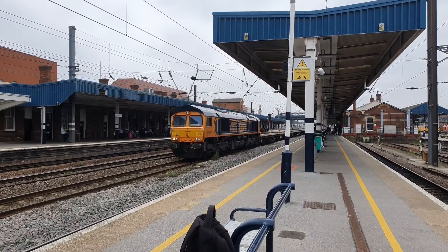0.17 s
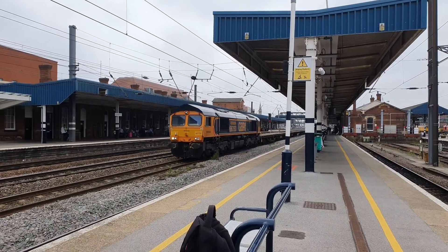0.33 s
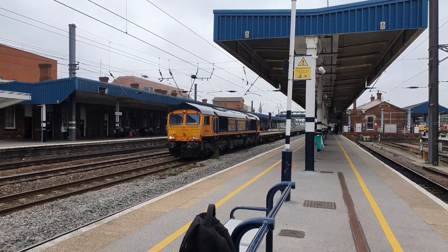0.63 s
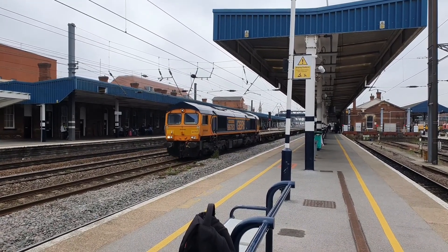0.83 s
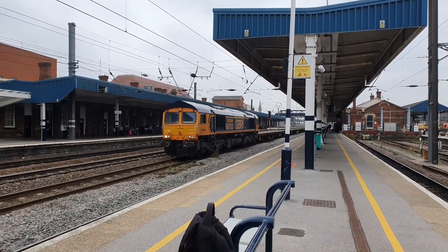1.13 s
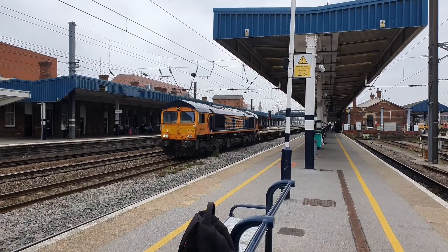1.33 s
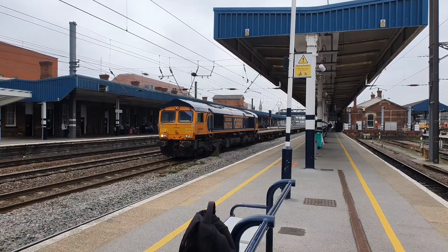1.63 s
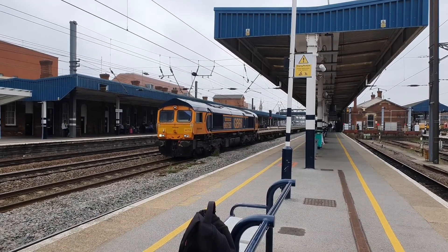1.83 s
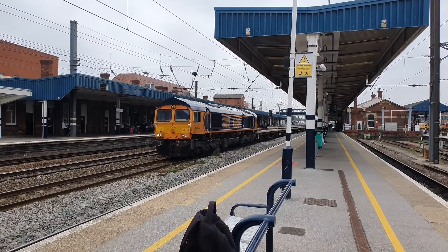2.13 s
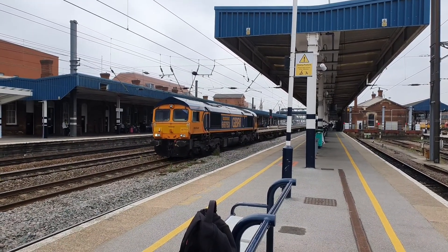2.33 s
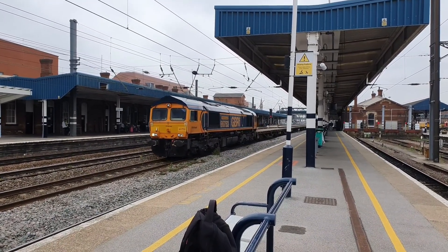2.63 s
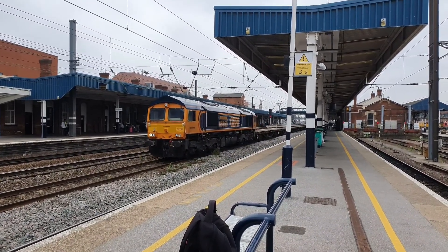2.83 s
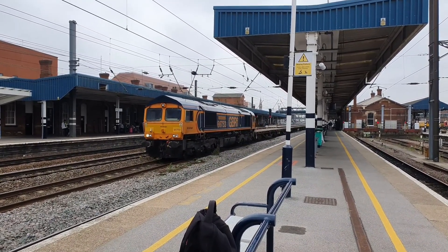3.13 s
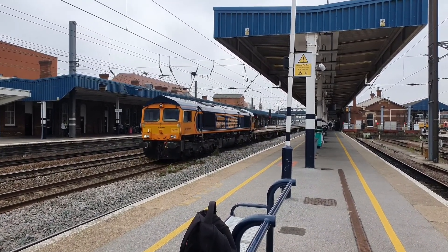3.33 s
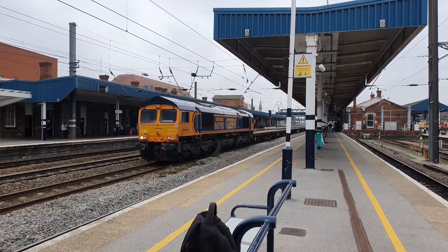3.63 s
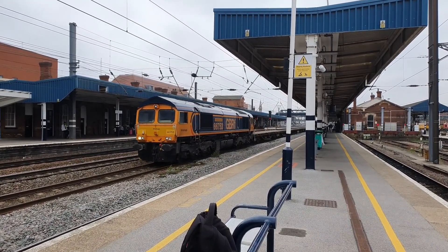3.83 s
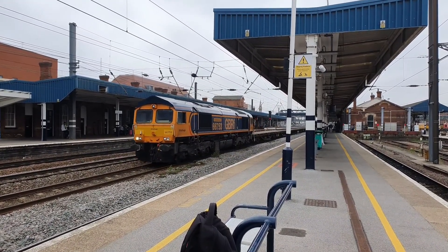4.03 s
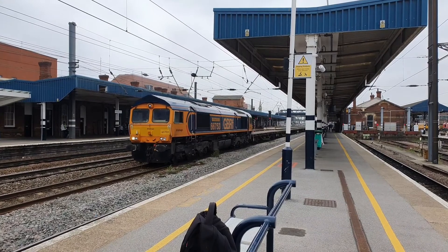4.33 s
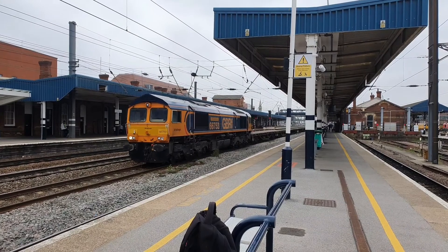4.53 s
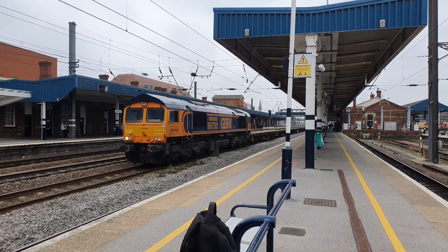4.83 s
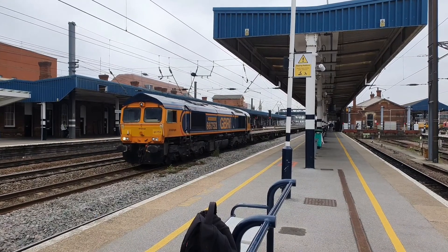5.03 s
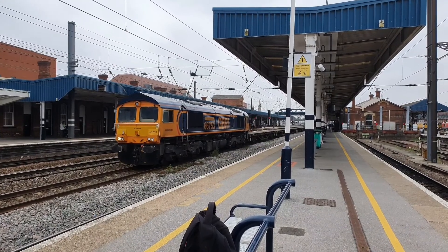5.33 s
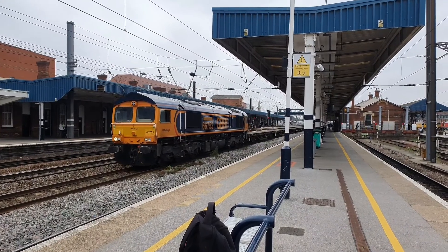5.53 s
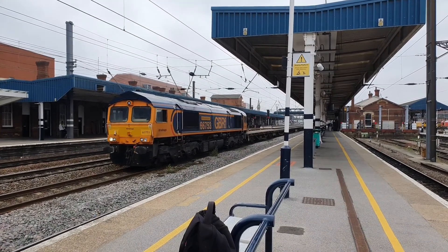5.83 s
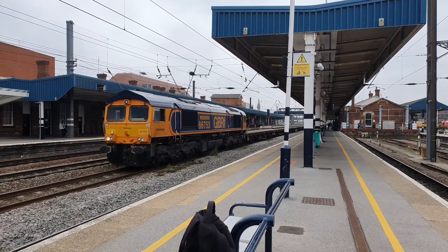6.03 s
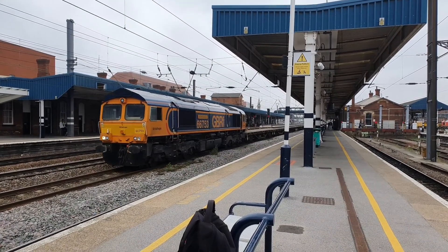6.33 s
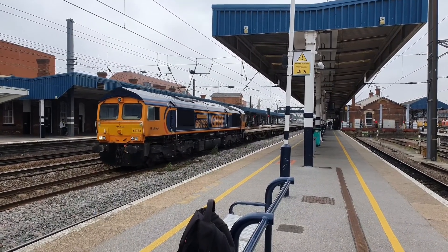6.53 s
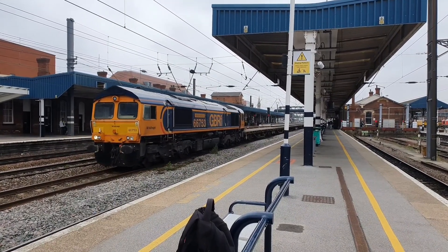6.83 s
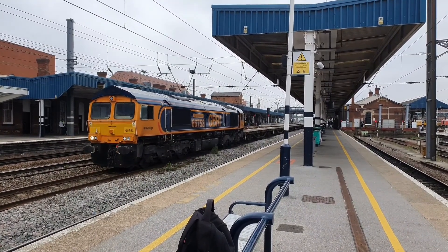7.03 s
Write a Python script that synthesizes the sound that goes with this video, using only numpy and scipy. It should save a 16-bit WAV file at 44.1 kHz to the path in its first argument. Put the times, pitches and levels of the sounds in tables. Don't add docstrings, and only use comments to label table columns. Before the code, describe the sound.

Continuous diesel engine at low steady speed, some distance away and slowly approaching beside a platform canopy. Low humming pulses, woolly rumble and repeating metallic clatter sit beneath a medium hum-like whine and a thin higher whistle. Compressed air spits crisply once near the start, again more softly, then only faintly. Soft low wind puffs touch the hand-held microphone mainly in the middle. The whines grow clearer by the end.

```python
import sys
import numpy as np
from scipy import signal
from scipy.fft import rfft, irfft, next_fast_len
from scipy.io import wavfile

SR = 44100
rng = np.random.default_rng(int(sys.argv[2]) if len(sys.argv) > 2 else 0)


def wav_record(signal):
    frames = np.transpose(np.atleast_2d(signal))
    bounded = np.clip(frames, -1, 1)
    quanta = np.round(bounded * 32767).astype(np.int16)
    wavfile.write(sys.argv[1], SR, quanta)


def attenuation_scalar(level_db):
    decades = np.asarray(level_db, float) / 20
    return 10 ** decades


N = 316638
SIZE = next_fast_len(N)
HZ = np.fft.rfftfreq(SIZE, 1 / SR)
T = np.arange(N) / SR
SLOW_T = T[::20]
CRANK_HZ = 5.7385


def evened(x):
    return x / np.sqrt(np.mean(abs(x) ** 2) + 1e-20)


def read(points, hz, order=1):
    table = np.array(points)
    return np.interp(np.log(hz + 1), np.log(table[:, 0] + 1), table[:, order])


def filtered(x, gain):
    return irfft(rfft(x, SIZE) * gain, SIZE)[:, :N]


def noise(gain):
    return evened(filtered(rng.standard_normal((2, SIZE)), gain))


def drift(rate_hz, count):
    knots = rng.standard_normal((count, 256))
    return evened(np.array([np.interp(T * rate_hz, np.arange(256), k) for k in knots]))


def flutter(rate_hz, count):
    knots = rng.standard_normal((2 * count, 2400))
    rows = np.array([np.interp(SLOW_T * rate_hz, np.arange(2400), k) for k in knots])
    return evened(rows[:count] + 1j * rows[count:])


def approach(t, far_db, near_db):
    return far_db + (near_db - far_db) * t * SR / N


def throb(t, once, at_once, twice, at_twice):
    turn = 2 * np.pi * CRANK_HZ * t
    swell_once = once * np.cos(turn - 2 * np.pi * at_once)
    swell_twice = twice * np.cos(2 * turn - 4 * np.pi * at_twice)
    return 1 + swell_once + swell_twice


# (multiple of crank speed, level far [dB], level near [dB])
EXHAUST = [(6, -47, -47), (7, -35, -50), (8, -47, -40), (9, -29, -25), (10, -51, -50), (11, -45, -35),
           (12, -41, -42), (13, -44, -47), (14, -45, -41), (15, -31, -33), (16, -34, -39), (17, -41, -47)]
# (multiple of crank speed, level far [dB], level near [dB])
BLOCK = [(29, -45, -39), (30, -48, -47), (31, -49, -43), (32, -44, -32), (33, -47, -44), (34, -46, -45),
         (35, -51, -40), (36, -53, -46), (46, -47, -43), (47, -49, -45), (48, -44, -44), (54, -49, -46),
         (57, -44, -46), (68, -60, -49), (69, -49, -50), (75, -47, -46), (79, -36, -45), (80, -41, -48),
         (81, -40, -42), (82, -43, -47), (84, -44, -46), (98, -50, -48)]
THUMPS = [(6, .26, .49, .7), (13, .28, .165, .42), (29, .125, .1, .06), (31, .125, .19, .31),
          (34, .125, .06, .1), (40, .33, -.2, -.2), (54, .87, .31, .31)]


def orders():
    null_s, null_width_s, null_depth_db = 2.76, 2, -3.5
    wall_null_db = null_depth_db * np.exp(-((SLOW_T - null_s) / null_width_s) ** 2)
    out = 0
    for k, far_db, near_db in EXHAUST + BLOCK:
        _, angle, *shape = [thump for thump in THUMPS if thump[0] <= k][-1]
        shared, apart = flutter(2.2, count=2)
        echo = 1 + .12 * shared + .2 * np.outer([1, -1], apart)
        turns = k * (CRANK_HZ * SLOW_T - angle) + shape[int(k) % 2]
        wave = np.exp(2j * np.pi * turns)
        db = approach(SLOW_T, far_db, near_db) + wall_null_db * (k < 9.5)
        out = out + np.sqrt(2) * attenuation_scalar(db) * (echo * wave).real
    return signal.resample_poly(out, 20, 1, axis=1)[:, :N]


# (frequency [Hz], level [dB per Hz])
CLATTER = [(45, -47), (130, -10), (260, -3.5), (350, -4.5), (450, -1.5), (620, -11.5), (900, -12.5),
           (1250, -17), (1700, -21.5), (2800, -15.5), (3300, -24.5), (4300, -32.5), (6800, -37.5),
           (8000, -52.5)]
# (frequency [Hz], level [dB per Hz])
AIR_TOP = [(7600, 2), (9100, 4), (11400, -2), (12000, -9), (15000, -10)]
# (frequency [Hz], share [0-1])
REPEAT = [(150, .75), (300, .88), (520, .88), (800, .7), (1100, .55), (1600, .3), (3500, .4), (4500, .02)]
# (frequency [Hz], likeness [0-1])
MEMORY = [(300, .94), (1000, .87), (2500, .55), (5000, .4)]


def clatter():
    far_db, near_db = -35, -34
    share = np.clip(read(REPEAT, HZ), 0, 1)
    memory = np.clip(read(MEMORY, HZ), 0, .97)
    one_turn_later = np.exp(-2j * np.pi * HZ / CRANK_HZ)
    comb = (1 - memory ** 2) / abs(1 - memory * one_turn_later) ** 2
    x = noise(np.sqrt(1 - share + share * comb)) * throb(T, 0.032, 0.36, 0.098, 0.24)
    x = filtered(x, attenuation_scalar(read(CLATTER, HZ) + read(AIR_TOP, HZ)))
    band = (HZ > 500) & (HZ < 2800)
    band_rms = np.sqrt(np.mean(irfft(rfft(x, SIZE) * band, SIZE) ** 2))
    return attenuation_scalar(approach(T, far_db, near_db)) * x / band_rms


# (level far [dB], level near [dB], fuzz width [Hz], clean share [0-1])
WHINES = [(-38.5, -33.5, 12, 0.87), (-58, -40.5, 79, 0.19), (-45, -43, 36, 0.84), (-48.5, -44.5, 25, 0.3),
          (-56, -47.5, 7.2, 0.33), (-55, -57.5, 10, 0), (-49, -46, 26, 0.38), (-78, -47, 12, 0.1),
          (-53, -42.5, 65, 0.06), (-39.5, -39.5, 46, 0.66), (-56, -63, 10, 0.1), (-55.5, -64, 12, 0.3),
          (-56.5, -50.5, 64, .0), (-53.5, -55.5, 51, 0.29), (-72.5, -70, 570, 0), (-50, -70, 15, 1),
          (-58.5, -56, 170, 0), (-67, -63, 18, 0.1)]
# (pitch [Hz], depth once a turn [0-1], angle [turns], depth twice a turn [0-1], angle [turns])
BEATS = [(418.5, .08, .19, .05, .28), (711.7, .2, .3, .2, .1), (906.7, .1, .72, .15, .31),
         (1344.6, .35, .61, .15, .25), (1360.2, .2, .61, .1, .25), (1582.7, .3, .5, .1, .2),
         (2016.7, .55, .51, .2, .5), (2261.1, .2, .99, .1, .42), (2985, .2, .41, .2, .3),
         (3058, .3, .41, .42, .32), (3368, .3, .4, .3, .3), (3477.3, .2, .4, .1, .3),
         (5562, .05, .62, .1, .08), (6048, .45, .58, .15, .45), (11150, .04, .5, .03, .39),
         (1812, .2, .5, .1, .3), (3690, .3, .35, .3, .3), (4032, .5, .51, .2, .5)]


def whines():
    twist, shake = .55, .45
    rough = .33
    facing_s, facing_width_s, facing_db = 3.9, 1.6, 1
    swell_db = facing_db * np.exp(-((SLOW_T - facing_s) / facing_width_s) ** 2)
    turn, size = 2 * np.pi * CRANK_HZ * SLOW_T, len(SLOW_T)
    slow_hz = np.fft.fftfreq(size, 20 / SR)
    slow_bins = np.fft.fftfreq(size, 1 / size).round().astype(int)
    quarter_apart = np.array([[0], [np.pi / 2]])
    spectrum = np.zeros((2, 10 * size + 1), complex)
    for (far_db, near_db, width, clean), (hz, *beat) in zip(WHINES, BEATS):
        clean = np.clip(clean, 0, 1)
        uneven = np.cos(turn - 2 * np.pi * beat[1]) + .7 * np.cos(2 * turn - 4 * np.pi * beat[3])
        bend = hz / 1500 * (twist * uneven + shake * flutter(14., count=2).real)
        line = np.exp(1j * (bend + quarter_apart)) * (1 + rough * flutter(30., count=2).real)
        skirt = np.exp(-1.5 * abs(slow_hz) / np.clip(width, 1, 300))
        grain = rng.standard_normal((size, 2, 2)) @ [1, 1j]
        fuzz = evened(np.fft.ifft(np.fft.fft(grain, axis=0).T * skirt))
        db = approach(SLOW_T, far_db, near_db) + swell_db * (3000 < hz < 3200)
        tone = np.sqrt(clean) * line + np.sqrt(1 - clean) * fuzz
        shape = attenuation_scalar(db) * throb(SLOW_T, *beat) * tone
        place = round(hz * 20 * size / SR) + slow_bins
        above_zero = place > 0
        spectrum[:, place[above_zero]] += np.fft.fft(shape)[:, above_zero]
    return 10 * np.sqrt(2) * irfft(spectrum, 20 * size)[:, :N]


# (frequency [Hz], level [dB per Hz])
SPIT = [(2500, -30), (4000, -12), (6300, 1), (7700, -5), (9400, -3), (12000, -3), (14300, -6), (14900, -25)]
# (time [s], level [dB], hold [s])
SPITS = [
    (1.585, -52.5, .06),
    (3.12, -74, .12),
    (3.69, -62, .07),
    (4.2, -75, .05),
    (4.79, -73, .06),
    (5.47, -72, .2),
    (5.78, -74, .04),
    (6.35, -74, .1),
]


def spits():
    rise_s, grain_db = 0.016, 1
    colour = attenuation_scalar(read(SPIT, HZ))
    top = 1 / (1 + (12300 / (HZ + 1)) ** 20)
    out = 0
    for part, t60_share in ((1 - top, 1), (top, 0.44)):
        level = 0
        for s, db, hold in SPITS:
            t60 = t60_share * (.4 + .04 * (db + 75))
            fall_db = 60 * np.clip(T - s - hold, 0, 3) / t60
            level = level + attenuation_scalar(db - fall_db) * np.clip((T - s) / rise_s, 0, 1)
        part_rms = np.linalg.norm(colour * part) / np.linalg.norm(colour)
        out = out + level * noise(colour * part) * part_rms
    return out * attenuation_scalar(grain_db * drift(39.0, count=2))


# (frequency [Hz], level [dB per Hz])
WASH = [(20, -46), (38, -10), (55, 7.5), (85, 6.5), (130, -3), (200, -3), (300, -42), (700, -100)]


def wash():
    level_db, waver_db = -34, 0.5
    push = throb(T, .15, .27, .45, .27)
    return attenuation_scalar(level_db + waver_db * drift(3.7, count=1)) * push * noise(attenuation_scalar(read(WASH, HZ)))


# (frequency [Hz], level [dB per Hz])
WIND = [(8, -14), (22, 0), (45, 2), (90, 2), (170, -12), (300, -30), (700, -100)]
# (time [s], level [dB])
GUSTS = [
    (0.0, -58),
    (1.6, -42),
    (3.02, -40.5),
    (3.56, -48),
    (4.2, -44),
    (4.5, -45),
    (5.8, -56),
    (7.15, -57),
]


def wind():
    calm_db, gust_s = -52.5, 0.098
    gain_db, lump_db = 7, 3
    gusts = attenuation_scalar(calm_db) + sum(attenuation_scalar(top_db) * np.exp(-((T - s) / gust_s) ** 2) for s, top_db in GUSTS)
    return gusts * attenuation_scalar(gain_db + lump_db * drift(14.0, count=1)) * noise(attenuation_scalar(read(WIND, HZ)))


# (frequency [Hz], likeness [0-1], left leads [radians], left minus right [dB])
PORTS = [(60, .9, 0, 0), (130, .9, .05, -.5), (250, .98, .15, -1), (420, .99, .25, -1.3), (620, .7, .5, 0),
         (900, .62, .5, 1), (1350, .65, 1.35, 3), (2000, .6, -.9, .5), (3050, .72, .2, -2.2),
         (4300, .33, -.3, -1.5), (5550, .45, 3.1, -.3), (7000, .2, 3, .6), (8500, .05, 1.5, 1.3),
         (12000, .05, 1.5, .6)]


def ports(x):
    a, b = rfft(x, SIZE)
    same = np.clip(read(PORTS, HZ), 0, 1)
    tilt = np.exp(.5j * read(PORTS, HZ, order=2)) * attenuation_scalar(read(PORTS, HZ, order=3) / 2)
    left = a * tilt
    right = (same * a + np.sqrt(1 - same ** 2) * b) / tilt
    return irfft(np.array([left, right]), SIZE)[:, :N]


def scene():
    return orders() + ports(clatter() + whines() + spits() + wash() + wind())


def top_cut(x):
    return signal.sosfilt(signal.butter(12, 15130, fs=SR, output="sos"), x)


def record(dry):
    return top_cut(dry)


dry = scene()
out = record(dry)
wav_record(out)
```